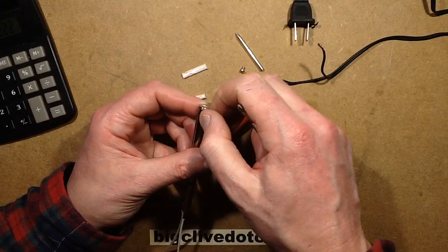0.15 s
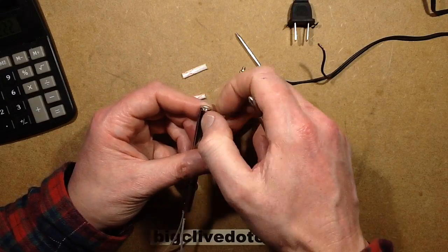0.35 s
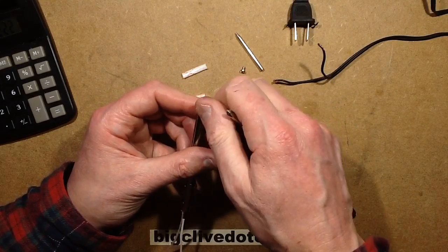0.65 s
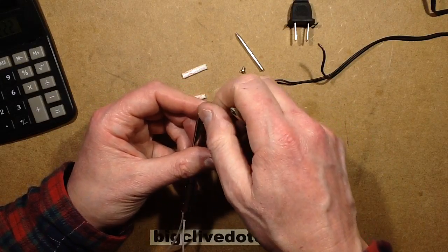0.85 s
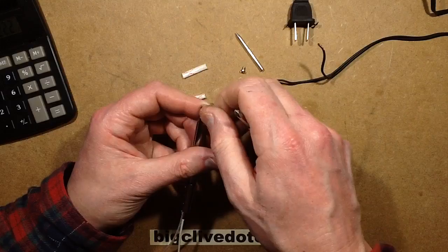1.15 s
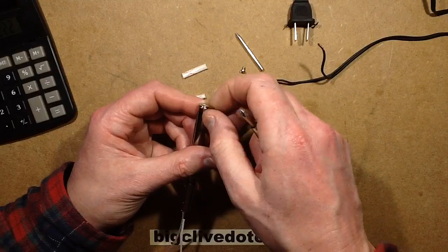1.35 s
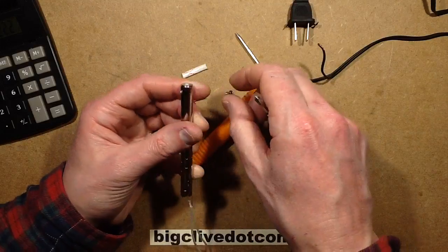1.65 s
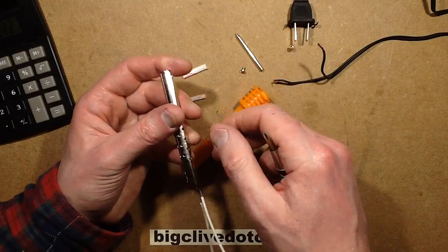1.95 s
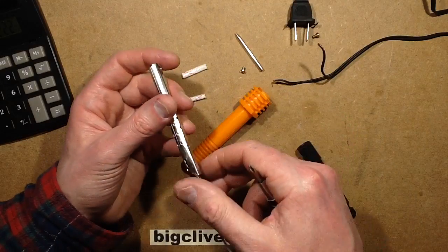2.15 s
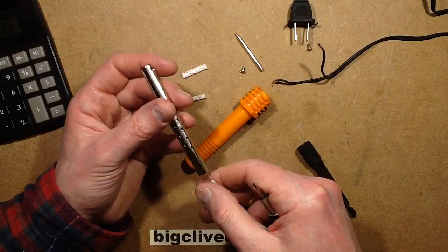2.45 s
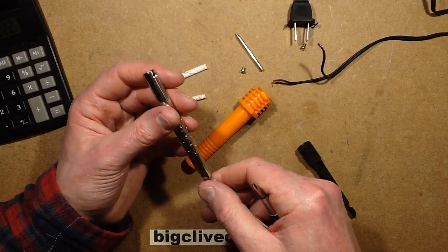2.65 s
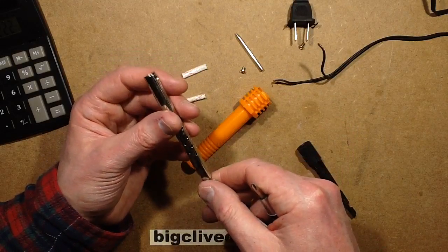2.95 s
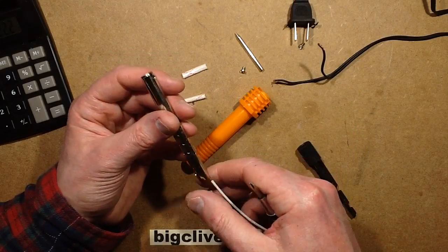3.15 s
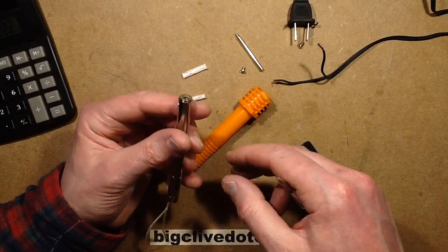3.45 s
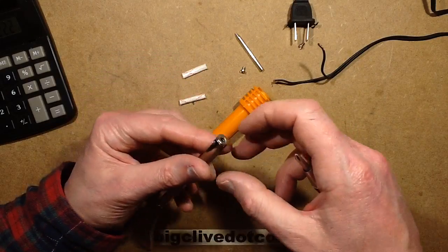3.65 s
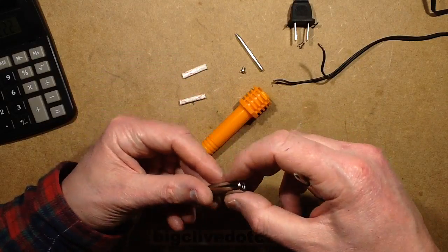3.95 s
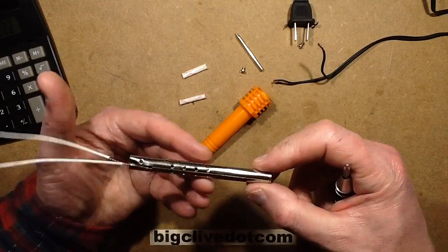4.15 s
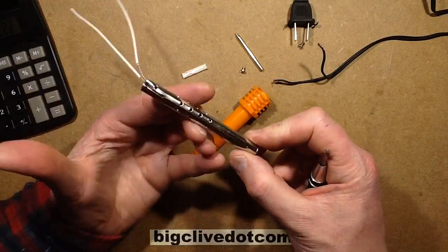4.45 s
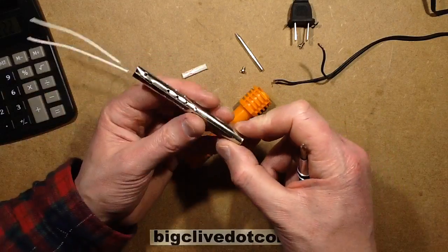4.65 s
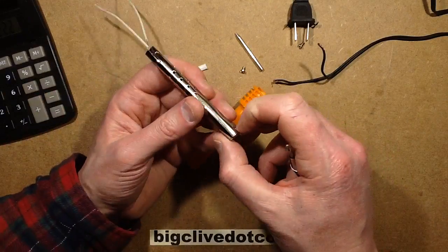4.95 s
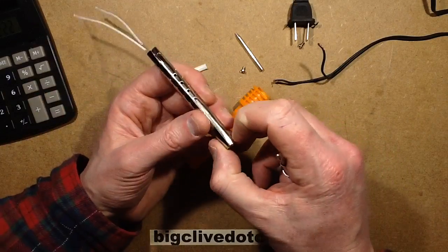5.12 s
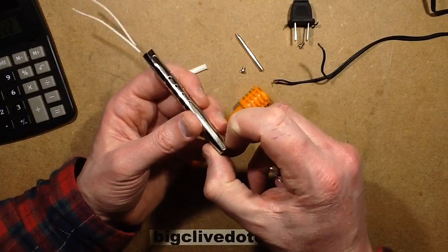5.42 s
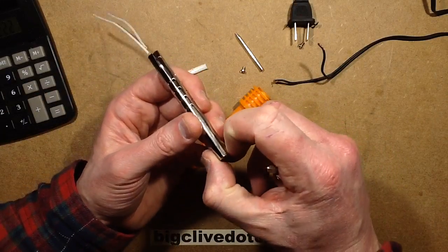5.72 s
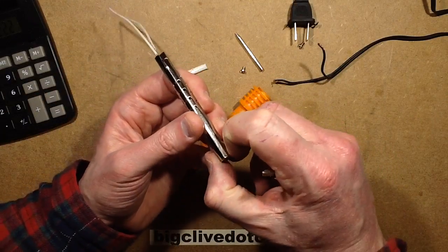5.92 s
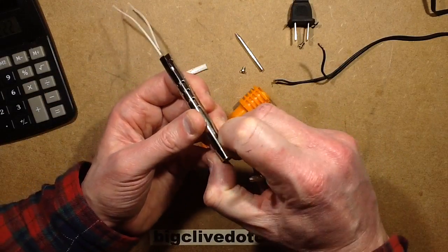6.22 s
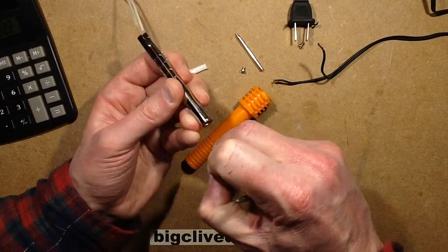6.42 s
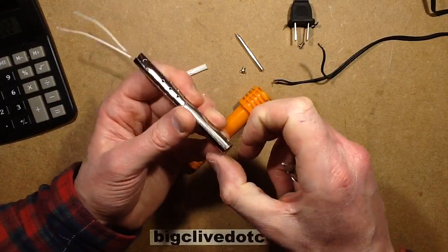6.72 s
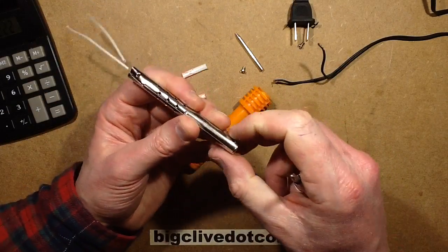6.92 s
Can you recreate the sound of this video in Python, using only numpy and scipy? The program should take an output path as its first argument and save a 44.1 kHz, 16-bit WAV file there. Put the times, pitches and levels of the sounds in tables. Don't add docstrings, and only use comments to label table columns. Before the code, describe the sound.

A small, quiet room heard close up, with low rumble and faint hiss throughout. From 0.2 to 0.8 seconds a fingernail makes very faint, high metallic pings on a nut. At 1.2 the nut slips free in a quick bright clatter and scrape. At 1.73 a plastic handle strikes the board with a loud, hard clack, bounces at 1.81, 1.89 and 1.95, then patters faster and weaker until about 2.15. From 2.2 to 3.9 wires tick and slide drily inside a gripped thin steel tube, with dull little knocks around 3.5 to 3.7. From 4.0 to 4.9 the looser tube rings more, with stronger rubs near 4.2 and a soft board brush near 4.8. Near quiet follows, with one tiny tick at 5.84. At 6.36 and 6.38 a crisp double snap bursts out, with a dull knuckle knock and bright rattle settling by 6.5. Faint wire rubs linger to the end.

```python
import sys
import numpy as np
from scipy import signal
from scipy.io import wavfile
from scipy.ndimage import uniform_filter1d

SR = 44100
rng = np.random.default_rng(int(sys.argv[2]) if len(sys.argv) > 2 else 0)


def attenuation_scalar(level_db):
    decades = np.asarray(level_db, float) / 20
    return 10 ** decades


def log_audio(samples):
    frames = np.atleast_2d(samples).T
    limited = np.clip(frames, -1, 1)
    pcm = np.round(limited * 32767).astype(np.int16)
    wavfile.write(sys.argv[1], SR, pcm)


N = 311958


def evened(x):
    return x / np.sqrt(np.mean(x ** 2) + 1e-20)


def peaked(x):
    return x / abs(x).max()


def read(points, hz):
    f, value = np.transpose(points)
    return np.interp(np.log(hz + 1), np.log(f + 1), value)


def add(mix, s, sound):
    part = mix[round(s * SR):][:len(sound)]
    part += sound[:len(part)]


def band(x, lo_hz, hi_hz):
    sos = signal.butter(2, [lo_hz, min(hi_hz, 20000)], "band", fs=SR, output="sos")
    return signal.sosfilt(sos, x)


def ring(x, modes, order=1):
    out = np.zeros(len(x))
    for hz, width, db in modes:
        r = np.exp(-np.pi * width / SR)
        part = x
        for _ in range(order):
            part = signal.lfilter([1 - r], [1, -r * np.exp(2j * np.pi * hz / SR)], part)
        out += attenuation_scalar(db) * part.real
    return out


def favour(modes, hz, grip, slope_db):
    chance = rng.standard_normal(len(modes))
    chosen = []
    for (f, width, db), z in zip(modes, chance):
        loss_db = min(slope_db * abs(np.log2(f / hz)), 15)
        chosen.append((f, width * grip, db + 2.9 * z - loss_db))
    return chosen


def struck(modes, t60):
    t = np.arange(3000) / SR
    out = np.zeros(len(t))
    for hz, width, db in modes:
        decay = np.exp(-np.pi * max(width, 2.2 / t60) * t)
        out += attenuation_scalar(db) * decay * np.sin(2 * np.pi * (hz * t + rng.random()))
    return out * np.minimum(t / 0.00069, 1)


def chatter(t60, spiky_db, first):
    t = np.arange(3000) / SR
    spikes_db = spiky_db * np.minimum(rng.exponential(1, len(t)), 3)
    spikes = rng.standard_normal(len(t)) * attenuation_scalar(spikes_db)
    strike = 1 + first * np.exp(-t / 0.00026)
    return spikes * strike * attenuation_scalar(-60 * t / max(t60, 0.002)) * np.minimum(t / 0.00065, 1)


def level(start, top, end, db, rise_db, fall_db):
    levels_db = [db - rise_db, db, db - fall_db]
    return attenuation_scalar(np.interp(np.arange(N) / SR, [start, top, end], levels_db, left=-200, right=-200))


def stick_slip():
    jumps = evened(band(rng.standard_normal(N), 7.4, 110))
    return rng.standard_normal(N) * attenuation_scalar(2.1 * jumps)


# f/Hz, level/dB per Hz
AIR_COLOUR = [(15, -80), (25, -47), (43, -33), (57, -33), (135, -1), (272, -3.5), (311, -6.5), (418, -12),
              (478, -12.5), (576, -18), (642, -18.5), (1010, -24), (4200, -27.5), (14000, -27),
              (15200, -33)]


def air():
    frames, hz = N // 512 + 6, np.fft.rfftfreq(2048, 1 / SR)
    a, b = rng.standard_normal((2, frames, len(hz)))
    swell = evened(uniform_filter1d(rng.standard_normal(frames), size=30))
    gain = attenuation_scalar(read(AIR_COLOUR[:-1], hz)[:, None] + 0.6 * swell * (hz < 900)[:, None])
    noise = signal.istft(gain * (a + 1j * b).T, nperseg=2048, noverlap=1536)[1][:N]
    return attenuation_scalar(-59) * evened(noise)


# f/Hz, time to fall by 60 dB/s
ROOM_FADE = [(300, 0.17), (1500, 0.13), (5000, 0.14), (14000, 0.12)]


def room(x):
    out, turn = np.zeros(N), np.arange(N) / SR * 5.5
    at = np.arange(0, SR // 2 - 20, 20)
    build_up_s = 0.017
    for k in range(3):
        taps = np.zeros(SR // 2)
        taps[at + rng.integers(0, 20, len(at))] = rng.choice([-1., 1.], len(at))
        hz, t, z = signal.stft(taps, SR, nperseg=128)
        fade = attenuation_scalar(-60 * t / read(ROOM_FADE, hz)[:, None])
        tail = signal.istft(z * fade, SR, nperseg=128)[1]
        tail *= np.minimum(np.arange(len(tail)) / SR / build_up_s, 1) ** 2
        share = np.sqrt(2 / 3) * np.cos(np.pi * (turn + k / 3))
        out += signal.fftconvolve(x * share, tail / np.linalg.norm(tail))[:N]
    return out


SHEEN_BAND = (11000, 15000)


def clicks(rows, sharpness, crack, sheen_db, t60, dull_db=None):
    out = np.zeros(N)
    for s, db, ring_hz, *own_dull_db in rows:
        blow = chatter(t60, spiky_db=2.0, first=0.26)
        body = peaked(ring(blow, [(ring_hz, ring_hz / sharpness, 0)], order=2))
        above = band(band(blow, 0.72 * ring_hz, 1.72 * ring_hz), 1.25 * ring_hz, 15700)
        body += crack * peaked(above)
        body += attenuation_scalar(own_dull_db[0] if own_dull_db else dull_db) * peaked(band(blow, 450, 1350))
        body += attenuation_scalar(sheen_db) * peaked(band(blow, *SHEEN_BAND))
        add(out, s, attenuation_scalar(db) * peaked(body))
    return out


# t/s, peak level/dB, ring f/Hz
NUT_PINGS = [
    (0.2354, -48, 5500),
    (0.3301, -53, 4910),
    (0.428, -45.5, 5160),
    (0.8155, -55.5, 5400),
]
# t/s, peak level/dB, strongest ring f/Hz
NUT_SLIP = [(0.3302, -43, 10200), (0.503, -51, 5370), (0.5078, -57, 4920), (1.1854, -35, 4930),
            (1.1942, -36.5, 5070), (1.1972, -32, 10100), (1.2065, -36, 9900), (1.2124, -46, 5160),
            (1.2205, -38, 8200), (1.2368, -40.5, 5100), (1.2405, -38, 10000), (5.841, -50, 5960)]


def nut_clicks():
    out = clicks(NUT_PINGS, 7.0, 0.05, sheen_db=-34, t60=0.015, dull_db=-30)
    return out + clicks(NUT_SLIP, 2.0, 0.73, sheen_db=-15, t60=0.012, dull_db=-24)


# f/Hz, width/Hz, level/dB
NUT_MODES = [(4500, 250, -6), (5100, 300, 5), (6000, 270, 1), (8300, 500, -8), (10100, 450, -5),
             (14000, 900, -6)]
# start, strongest and end t/s
SCRAPE_TIMES = (1.185, 1.198, 1.25)


def nut_scrape(grit):
    return level(*SCRAPE_TIMES, -54.5, rise_db=15, fall_db=9) * evened(ring(grit, NUT_MODES))


# t/s, peak level/dB, ring f/Hz, dull part level/dB re peak
BOARD_KNOCKS = [
    (1.1852, -47, 2160, -15),
    (3.5124, -42.5, 1990, -9),
    (3.6431, -42, 2480, -5),
    (3.6445, -48, 2600, -16),
    (3.712, -54, 2610, -3),
    (6.357, -41.5, 725, 14),
    (6.4028, -46, 1300, 15),
]


def board_knocks():
    return clicks(BOARD_KNOCKS, 2.18, 0.51, sheen_db=-4.5, t60=0.026)


# t/s, peak level/dB, strongest ring f/Hz, thump and top sheen level/dB re peak
HANDLE_BOUNCES = [(1.7283, -13.5, 3980, -20.5, -11), (1.7514, -44, 3670, -30, -26),
                  (1.8104, -16.5, 4370, -23, -50), (1.8907, -21, 3230, -17.5, -44),
                  (1.946, -18.5, 5430, -25.5, -12.5), (1.9926, -20.5, 6310, -35, -10.5),
                  (2.0076, -33.5, 5800, -22, -26), (2.0388, -25, 6600, -32, -37),
                  (2.0606, -29, 2450, -32, -33), (2.0809, -32, 6470, -39, -40),
                  (2.0977, -40, 2470, -16, -40), (2.1079, -43, 2500, -27, -40),
                  (2.118, -50, 2300, -24, -40), (2.15, -50.5, 2950, -11, -40)]
# f/Hz, level/dB per Hz
HANDLE_COLOUR = [(150, -46), (250, 2), (640, -21), (2240, 1.5), (2670, -7), (2910, 2.5), (3770, -11),
                 (4190, 0), (12300, -2.5), (14900, -9), (16000, -62)]
# f/Hz, width/Hz, level/dB
END_MODES = [(1086, 75, -1.5), (1470, 54, -2), (1910, 84, -13), (2260, 110, 4), (2950, 100, -0.5),
             (3230, 65, 0.5), (3470, 61, -2), (3680, 58, 3), (3976, 140, 11), (4370, 120, 11),
             (4850, 110, -6), (5100, 90, 8), (5564, 140, 6), (5930, 110, -3)]
# f/Hz, width/Hz, level/dB
FLAT_MODES = [(942, 71, 5.5), (1275, 39, -6.5), (1653, 100, -12), (2190, 93, -3), (2545, 57, 2),
              (2980, 97, -7), (3400, 62, 3), (3850, 70, -1), (3920, 110, -10), (5230, 110, -3),
              (5693, 150, 7.5), (6340, 87, 3.5), (7040, 74, 4)]
# f/Hz, width/Hz, level/dB
BOARD_MODES = [(317, 280, -5.5), (510, 300, -2.5), (952, 260, -6), (1120, 210, 2)]


def handle():
    out, hz = np.zeros(N), np.fft.rfftfreq(1024, 1 / SR)
    gain = attenuation_scalar(2 * read(HANDLE_COLOUR, hz)) * (hz < hz[-1])
    colour = signal.minimum_phase(signal.firwin2(1023, hz, gain, fs=SR))
    for k, (s, db, ring_hz, thump_db, sheen_db) in enumerate(HANDLE_BOUNCES):
        if k == 0:
            t60, modes, ring_gain = 0.037, END_MODES, 1.15
        else:
            t60, modes, ring_gain = 0.036, favour(FLAT_MODES, ring_hz, 1.0, 8.1), 0.9
        blow = chatter(t60, spiky_db=2.5, first=0.045)
        crack = np.convolve(blow, colour)[:len(blow)]
        top_hz = 9500 * attenuation_scalar(0.42 * min(db + 31, 0))
        body = peaked(band(band(crack, 274, top_hz), 170, top_hz))
        sheen = band(band(crack, 7500, 20500), 7500, 20500)
        body += attenuation_scalar(sheen_db + 2.5) * peaked(sheen)
        body += ring_gain * peaked(struck(modes, t60))
        body += 0.24 * peaked(ring(blow, [(ring_hz, 600, 0)]))
        thump = peaked(ring(blow, BOARD_MODES, order=2))
        add(out, s, attenuation_scalar(db) * peaked(body + attenuation_scalar(thump_db + 5.0) * thump))
    return out


# f/Hz, width/Hz, level/dB
BENDING_MODES = [(3850, 68, 5.5), (4510, 33, 0.5), (5330, 230, -4.5), (6310, 170, -9.5), (7020, 92, -10.5),
                 (7220, 45, 6.5), (8380, 430, -8.5), (8700, 100, -8), (9870, 150, -4.5), (10100, 20, -11),
                 (10800, 28, 0), (11400, 28, 2), (13000, 130, -17)]
# f/Hz, width/Hz, level/dB
HOOP_MODES = [(12650, 200, -9), (13150, 110, 0), (13520, 100, 0), (13850, 200, -4), (14400, 250, -8)]


def contacts(rows, rise, length, bare, grip, bend_db, hoop_hz):
    out, t = np.zeros(N), np.arange(4000) / SR
    for s, db, bend_hz, *own_hoop_db in rows:
        rub = rng.standard_normal(len(t)) * (1 - np.exp(-t / rise)) * np.exp(-t / length)
        hoop_db = own_hoop_db[0] if own_hoop_db else -11
        bending = ring(rub, favour(BENDING_MODES, bend_hz, grip, 27.0), order=2)
        hoop = ring(rub, favour(HOOP_MODES, hoop_hz, 2.3, 150.0), order=2)
        body = attenuation_scalar(bend_db) * peaked(bending) + attenuation_scalar(hoop_db + 5) * peaked(hoop)
        body += bare * peaked(band(rub, 5200, 15000))
        add(out, s, attenuation_scalar(db - 3.5) * body)
    return out


# t/s, peak level/dB, favoured bending f/Hz
GRIPPED_RUBS = [
    (2.1444, -50, 3760),
    (3.2494, -51, 3800),
    (3.4376, -44, 4510),
    (3.5294, -45, 4530),
    (3.5538, -46, 8240),
    (3.6636, -40, 4020),
    (3.7334, -45, 8380),
    (3.8247, -48, 8390),
]
# t/s, peak level/dB, favoured bending f/Hz
LOOSE_RUBS = [(4.0507, -49, 8400), (4.0944, -46, 5370), (4.1684, -34.5, 6310), (4.2532, -37, 5330),
              (4.268, -34.5, 6310), (4.275, -44, 3830), (4.2975, -52, 5330), (4.3894, -43.5, 5300),
              (4.4384, -42, 9870), (4.5211, -48, 8370), (4.5444, -57, 8410), (4.5744, -46, 8280),
              (4.6706, -46, 6700), (4.8658, -57, 6090), (4.9194, -52, 8160), (6.5744, -53, 7830),
              (6.6994, -51.5, 8100), (6.8294, -50, 9680), (6.8594, -60, 7870), (6.9394, -49, 9500)]
# t/s, peak level/dB, favoured bending f/Hz, hoop level/dB re peak
GRIPPED_TICKS = [(2.2032, -45.5, 8040, -9), (2.2857, -56, 8620, -9), (2.3605, -46, 7400, -18),
                 (2.5132, -38.5, 8940, -23), (2.6005, -50, 6990, -10), (2.6479, -44, 7390, -22),
                 (2.7851, -40, 3700, -12), (2.7933, -43, 8160, -23), (2.8655, -42, 7120, -27),
                 (3.0563, -46, 9010, -18), (3.0644, -46, 7080, -15), (3.0913, -42.5, 7080, -16),
                 (3.1425, -43.5, 4230, -16), (3.2281, -53, 5060, -7), (3.4087, -50, 9950, -6),
                 (3.4735, -54, 9150, -3), (3.5104, -37, 7160, -24), (3.6485, -39, 3730, -14),
                 (3.7888, -42.5, 5260, -10)]
# t/s, peak level/dB, favoured bending f/Hz, hoop level/dB re peak
LOOSE_TICKS = [(3.9703, -42.5, 5100, -15), (4.0488, -38, 8400, -15), (4.157, -47, 7520, -14),
               (4.1797, -48, 3850, -20), (4.2398, -43, 7390, -14), (4.2874, -38, 5250, -20),
               (4.341, -44.5, 5340, -11), (4.3724, -45, 3850, -15), (4.4362, -37.5, 10000, -4.5),
               (4.5853, -47, 8300, -5), (4.6498, -47, 7570, -14), (4.6826, -46.5, 7100, -2),
               (4.8076, -44, 4960, -12)]


def wire_ticks_and_rubs():
    gripped_hoop_hz, loose_hoop_hz = 13400, 13500
    out = contacts(GRIPPED_TICKS, 0.00023, 0.0039, 0.59, 4.9, -13, gripped_hoop_hz)
    out += contacts(LOOSE_TICKS, 0.00023, 0.0021, 0.65, 1.6, -9, loose_hoop_hz)
    out += contacts(GRIPPED_RUBS, 0.0042, 0.0042, 0.34, 4.6, -18, gripped_hoop_hz)
    return out + contacts(LOOSE_RUBS, 0.006, 0.0062, 0.48, 1.45, -6.5, loose_hoop_hz)


# start, strongest and end t/s
SLIDE_TIMES = [
    (2.2, 2.51, 3.01),
    (3.01, 3.56, 3.85),
    (3.85, 4.22, 4.45),
    (4.4, 4.74, 5.1),
    (6.55, 6.85, 7.3),
]
SLIDE_LEVELS = [-66.5, -67, -61, -61.5, -69]


def wire_slides(grit, shimmer):
    strokes = zip(SLIDE_TIMES, SLIDE_LEVELS)
    slide = sum(level(*span, db, rise_db=13.5, fall_db=12) for span, db in strokes)
    return slide * (attenuation_scalar(-15) * shimmer + attenuation_scalar(-4) * evened(band(grit, 4500, 14000)))


# start, strongest and end t/s
TURN_TIMES = (3.98, 4.24, 4.65)


def tube_turn(grit):
    return level(*TURN_TIMES, -74, rise_db=3.0, fall_db=11) * evened(ring(grit, BENDING_MODES, order=2))


# start, strongest and end t/s
SWISH_TIMES = (4.535, 4.784, 4.838)


def board_swish(grit):
    return level(*SWISH_TIMES, -64.5, rise_db=15, fall_db=13) * evened(band(grit, 520, 2700))


# t/s, peak level/dB, strongest ring f/Hz
TUBE_SNAP = [
    (6.3569, -22, 4940),
    (6.3571, -24.5, 11400),
    (6.3573, -26.5, 2710),
    (6.3782, -22.5, 6040),
]
# t/s, peak level/dB, strongest ring f/Hz
NAIL_REBOUND = [
    (6.3603, -30, 4700),
    (6.3828, -26.5, 5000),
]
# t/s, peak level/dB, strongest ring f/Hz
TUBE_SETTLE = [(6.3961, -36, 9720), (6.404, -44, 11000), (6.4138, -41, 8830), (6.426, -41, 11400),
               (6.4463, -45, 11200), (6.4732, -42.5, 9400), (6.49, -48, 12500), (6.5141, -48, 9000),
               (6.515, -54.5, 4500)]


def tube_snap():
    out = clicks(TUBE_SNAP, 2.6, 0.65, sheen_db=-30, t60=0.0089, dull_db=-28)
    out += clicks(NAIL_REBOUND, 3.4, 0.2, sheen_db=-20, t60=0.011, dull_db=-28)
    return out + clicks(TUBE_SETTLE, 3.0, 0.35, sheen_db=-11, t60=0.022, dull_db=-15)


# start, strongest and end t/s
SHAKE_TIMES = (6.38, 6.386, 6.5)


def wire_shake(grit, shimmer):
    rattle = evened(band(grit, 8300, 15000)) + 0.4 * shimmer
    return level(*SHAKE_TIMES, -50.5, rise_db=2, fall_db=30) * rattle


def scene():
    grit = stick_slip()
    shimmer = evened(ring(grit, HOOP_MODES))
    held = nut_clicks() + nut_scrape(grit) + board_knocks() + wire_ticks_and_rubs()
    held += wire_slides(grit, shimmer) + tube_turn(grit) + board_swish(grit)
    held += tube_snap() + wire_shake(grit, shimmer)
    held = band(held, 72, 21000)
    dropped = band(handle(), 120, 19000)
    reflections = attenuation_scalar(-14) * room(dropped + attenuation_scalar(-2.5) * held)
    return (dropped + held + reflections + air())[None]


def top_cut(x):
    return signal.sosfilt(signal.butter(12, 16510, fs=SR, output="sos"), x)


def record(dry):
    edge_hz, above_edge_db = 15350, -36
    lowpass = signal.firwin(601, edge_hz, window=("kaiser", 7), fs=SR)
    low = signal.oaconvolve(dry, lowpass[None], "same")
    return top_cut(low + attenuation_scalar(above_edge_db) * (dry - low))


dry = scene()
out = record(dry)
log_audio(out)
```